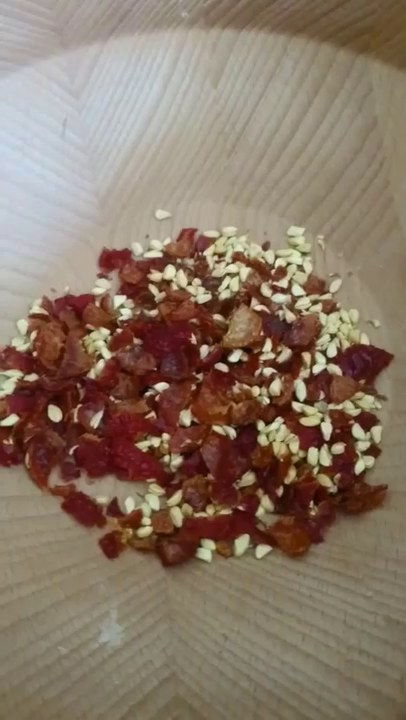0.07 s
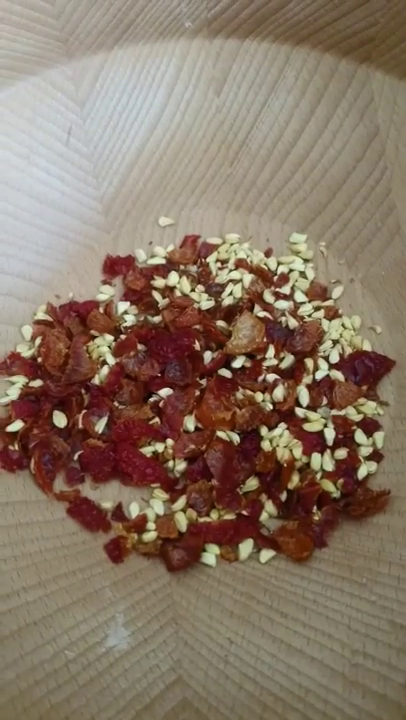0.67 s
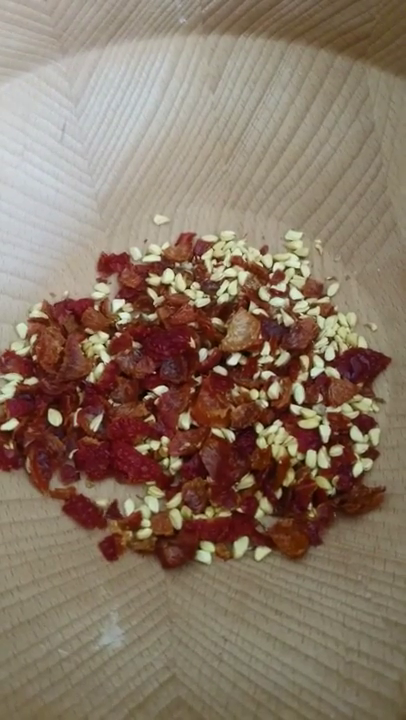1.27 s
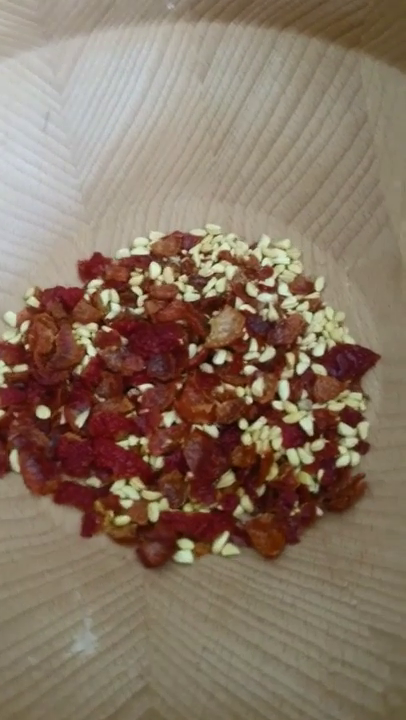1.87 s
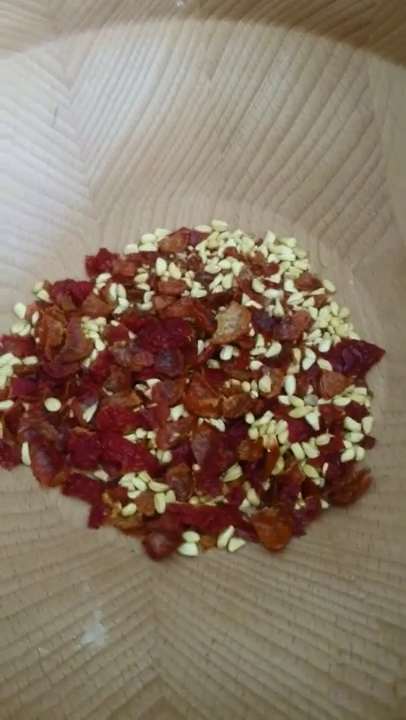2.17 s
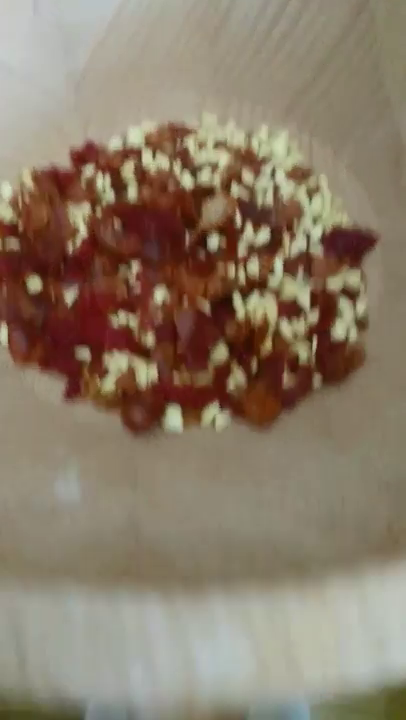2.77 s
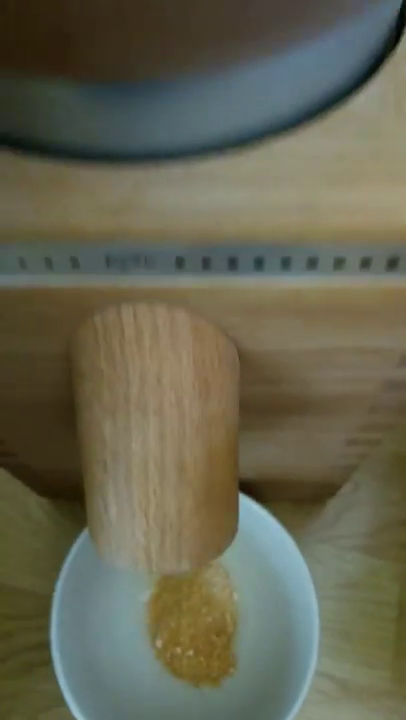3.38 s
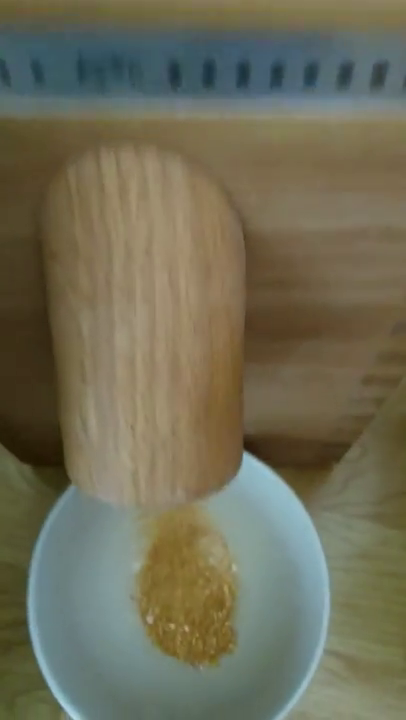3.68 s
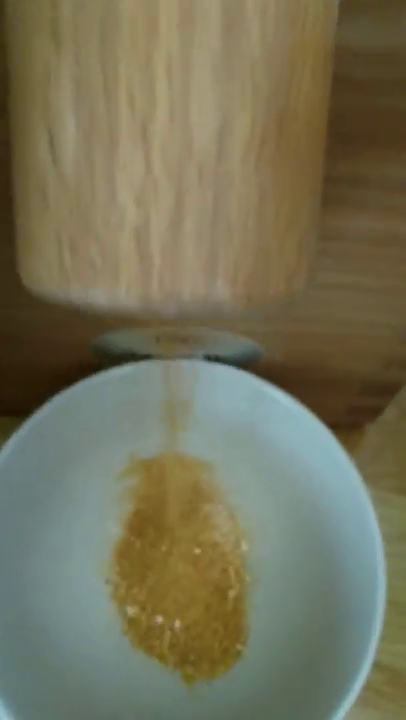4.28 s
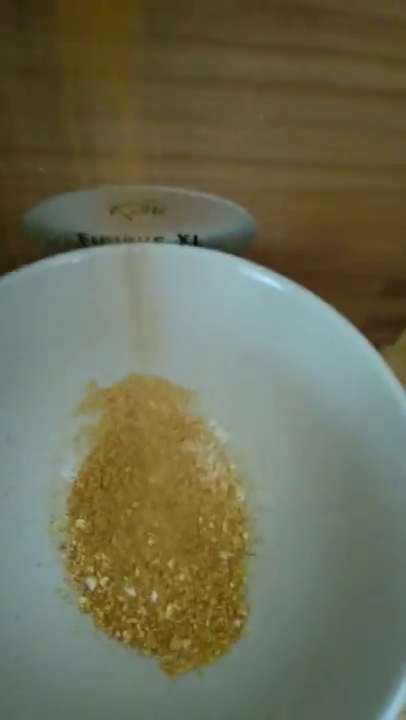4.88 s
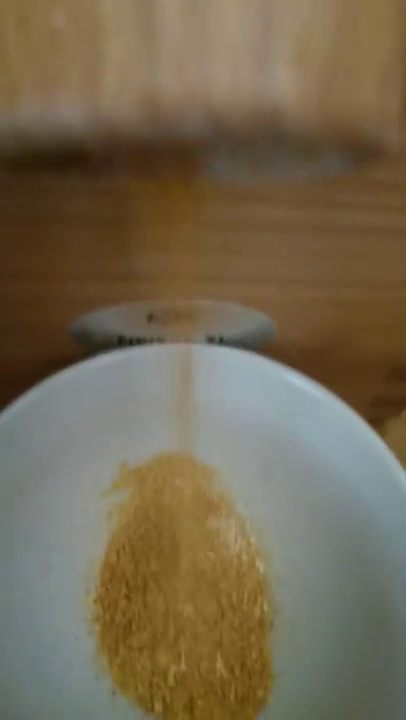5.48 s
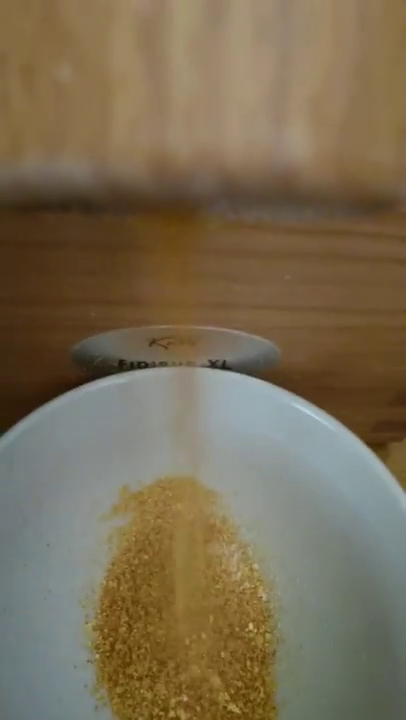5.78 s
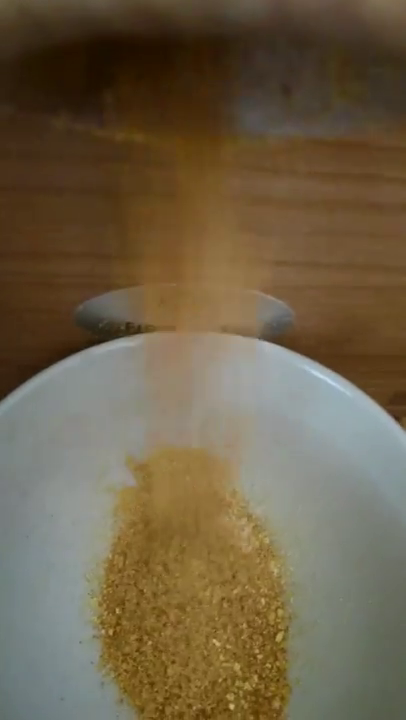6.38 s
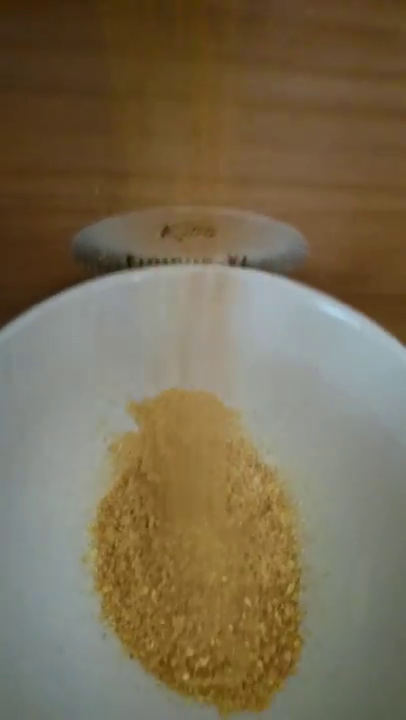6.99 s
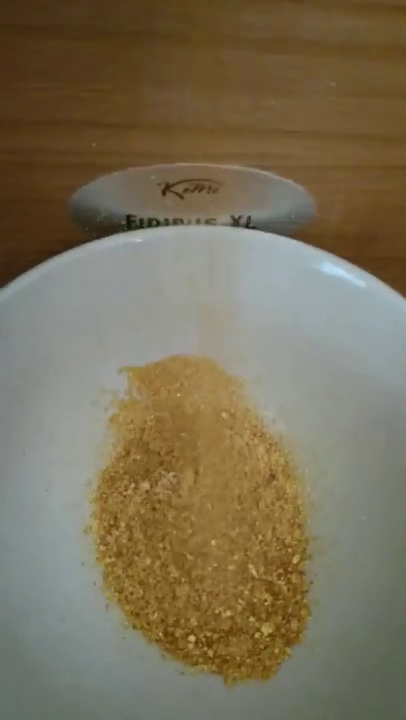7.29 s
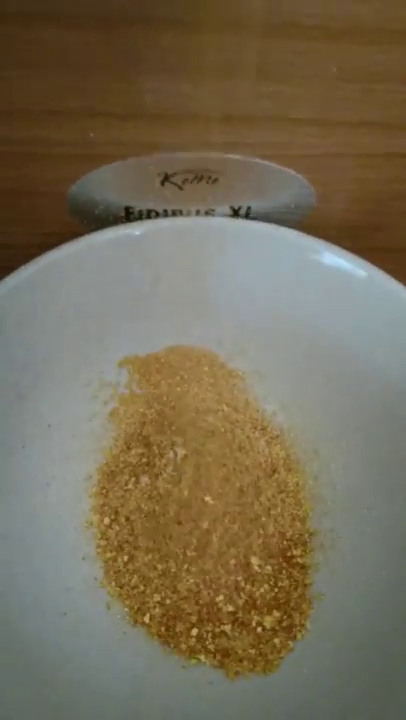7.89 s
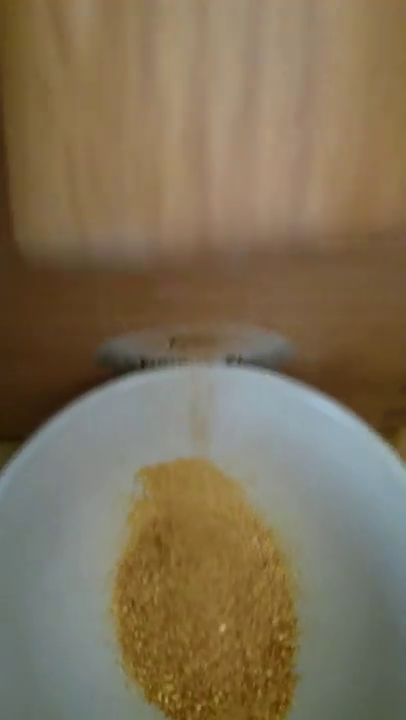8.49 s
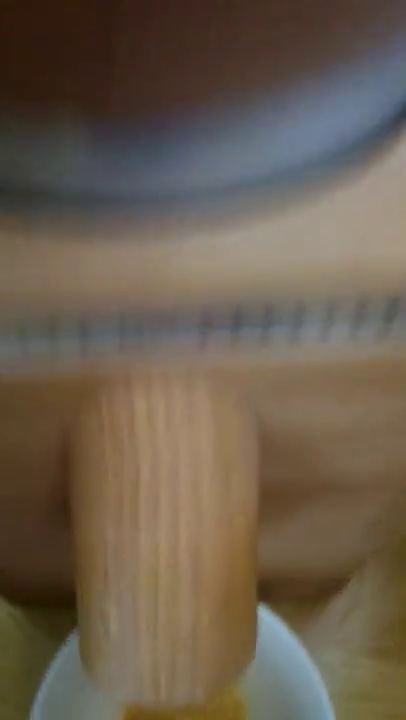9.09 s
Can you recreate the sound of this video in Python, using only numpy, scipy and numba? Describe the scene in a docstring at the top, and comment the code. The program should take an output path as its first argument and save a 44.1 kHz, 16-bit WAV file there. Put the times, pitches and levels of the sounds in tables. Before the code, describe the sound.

An electric stone mill clicks on and grinds dried chilli and seeds with a steady, gritty noise over its motor hum.

```python
"""On a worktop indoors, an electric stone mill in a wooden case starts with a sharp click and grinds
dried chilli and seeds. Fracturing grains, bunched by the turning stone, excite the resonances of the
case over the hum of the induction motor; now and then a hard seed snaps. A two-port microphone moves
from the hopper down the front to the flour spout, dips under it and comes back up, passing through
the beams, shadows and reflections of the case."""
import sys
import numpy as np
from scipy import signal
from scipy.fft import rfft, irfft
from scipy.io import wavfile
from scipy.ndimage import uniform_filter1d, minimum_filter1d
from numba import njit

SR = 44100
rng = np.random.default_rng(int(sys.argv[2]) if len(sys.argv) > 2 else 0)


def to_wav(s):
    """Save 16-bit WAV."""
    ch = np.atleast_2d(s).T  # columns
    pcm = np.round(np.clip(ch, -1, 1) * 32767)  # PCM
    wavfile.write(sys.argv[1], SR, pcm.astype(np.int16))


N = 407484
TIME, FREQ = np.arange(N) / SR, np.fft.rfftfreq(N, 1 / SR)
START_S, RETURN_S = 0.9628, 7.86  # the mill starts; the microphone turns back


def undb(db):
    """Amplitude ratio of a level in decibels."""
    return 10 ** (np.asarray(db) / 20)

def stereo(db, pan_db):
    """Level difference: left and right gains, where pan is left minus right."""
    return undb(db + np.array([np.atleast_1d(pan_db)]) * [[0.5], [-0.5]])

def curve(table, at=TIME):
    """Linear interpolation of each later column against the first."""
    points, *columns = np.transpose(table)
    return [np.interp(at, points, column) for column in columns]

def spectrum(table, hz):
    """Interpolation of each later column on a logarithmic frequency axis."""
    points, *columns = np.transpose(table)
    return [np.interp(np.log(hz + 1), np.log(points), column) for column in columns]

def wander(per_s):
    """Slow random modulation with a spread near 1."""
    knots = rng.standard_normal(400)
    return np.interp(TIME * per_s, np.arange(len(knots)), knots)

def decay(age, t60):
    """Exponential damping: 60 dB in t60 seconds."""
    return np.exp(-np.log(1000) * age / t60)

def bell(at_s, length_s):
    """Gaussian pulse, length_s wide at 1/e of its height."""
    return np.exp(-(2 * (TIME - at_s) / length_s) ** 2)

def resonance(hz, centre, width):
    """Lorentzian curve of unit height."""
    return 1 / (1 + (2 * (hz - centre) / width) ** 2)

def lowpass(hz, power=8):
    """Low-pass gain curve, one half at hz."""
    return 1 / (1 + (FREQ / hz) ** power)

def shape(x, gain):
    """Filtering by multiplication of the spectrum."""
    return irfft(rfft(x) * gain, N)

def ring(x, db, size=4096):
    """Minimum-phase filter of response db: being causal, it rings only after a blow."""
    cepstrum = irfft(np.log(undb(db)))
    cepstrum[1:size // 2] *= 2
    cepstrum[size // 2 + 1:] = 0
    impulse_response = irfft(np.exp(rfft(cepstrum)))
    return signal.oaconvolve(x, impulse_response)[:N]

@njit
def band(x, hz, q):
    """Second-order resonator (state-variable band-pass) with a moving centre."""
    y, band_state, low_state = np.empty(len(x)), 0., 0.
    for i in range(len(x)):
        g = np.tan(np.pi * hz[i] / SR)
        v = (band_state + g * (x[i] - low_state)) / (1 + g * (g + 1 / q))
        band_state = 2 * v - band_state
        low_state += 2 * g * v
        y[i] = v / q
    return y


# Path of the microphone: (time [s], place [0 hopper, 1 front, 2 spout, 3 under the spout])
MIC_PATH = [(1.95, 0), (2.52, .11), (2.85, .27), (3.1, .6), (3.4, 1), (3.65, 1.08), (4.15, 1.5),
            (4.35, 2.1), (4.6, 2.45), (4.95, 2.4), (5.2, 2.05), (5.65, 2.05), (6, 2.25), (6.55, 2.42),
            (6.8, 3), (7.85, 3), (8.05, 2.2), (8.24, 1.5), (8.48, 1.08), (8.74, .82), (9.05, .18),
            (9.24, .03)]
def mic_place():
    """Position of the receiver in the near field of the mill."""
    return curve(MIC_PATH)[0]

def at_place(values, place):
    """Linear interpolation between values at places 0 to 3."""
    return np.interp(place, np.arange(len(values)), values)

def way_back(takes_s=1):
    """Progress of the return: 0 on the way down, then rising to 1."""
    return np.clip((TIME - RETURN_S) / takes_s, 0, 1)


def room(sound, wet_db=-14, t60=0.18, low_hz=600):
    """Reverberation: worktop and walls return a short, weak tail."""
    age = np.arange(SR // 4) / SR
    tail = rng.standard_normal((2, len(age))) * decay(age, t60)
    tail = signal.sosfilt(signal.butter(2, low_hz, "high", fs=SR, output="sos"), tail)
    tail /= np.linalg.norm(tail, axis=1, keepdims=True)
    return sound + undb(wet_db) * signal.oaconvolve(sound, tail, axes=1)[:, :N]

def tick(at_s=0.872, hz=4030, db=-60, t60=0.17, hiss_db=-70):
    """Damped oscillation: a faint tick just before the start, with low hiss from then on."""
    age = np.maximum(TIME - at_s, 0)
    ping = undb(db) * decay(age, t60) * np.sin(2 * np.pi * hz * age)
    hiss = signal.lfilter([1], [1, -0.95], rng.standard_normal((2, N)))
    return ping + (age > 0) * undb(hiss_db) * hiss / hiss.std()

# Motor hum at places 0 to 3 on the way down: (level [dB], pan [dB])
HUM_LEVELS = [(-57, -11.5), (-42.5, -7.5), (-35.5, -4.5), (-33.5, -3.5)]
def motor_hum(place, hz=100, return_db=8.5):
    """Magnetic force pulses at twice the mains frequency; the way back passes closer to the motor."""
    db, pan_db = (at_place(column, place) for column in np.transpose(HUM_LEVELS))
    return np.sqrt(2) * stereo(db + return_db * way_back(), pan_db) * np.sin(2 * np.pi * hz * TIME)

# Shaft speed, rising a little toward the end, so the stone's tones creep up: (time [s], rate [turns/s])
SHAFT_SPEED = [(1, 22.9), (2.7, 22.85), (5.5, 23), (7, 23.3), (8.3, 23.2), (9.24, 23.4)]
def shaft_turns():
    """Phase in turns is the integral of the rotation rate."""
    return np.cumsum(curve(SHAFT_SPEED)[0]) / SR

# Tones of the stone: (order [cycles/turn], level at hopper [dB], level at spout [dB])
STONE_ORDERS = [(8, -66, -40.5), (12, -38, -38), (16, -36.5, -66), (20, -31.5, -46)]
def stone_tones(turns, place, rumble_db, waver_db=3, waver_per_s=11, drift_rad=0.65, throb=0.19):
    """Rotational harmonics grow with the bite and are amplitude-modulated once a turn."""
    bite = undb(0.35 * rumble_db) * (1 + throb * np.cos(2 * np.pi * turns))
    tones = 0
    for order, hopper_db, spout_db in STONE_ORDERS:
        swell, drift = wander(waver_per_s), wander(waver_per_s)
        db = np.interp(place, [0, 2], [hopper_db, spout_db]) + waver_db * swell
        tones += undb(db) * np.sin(2 * np.pi * order * turns + drift_rad * drift)
    return np.sqrt(2) * bite * tones

# Spells when the stones run close: (time [s], length [s], level [dB], pan [dB])
CLOSE_SPELLS = [(6.33, 0.8, -22, -8), (7.75, .35, -24.5, -6), (8.185, 0.4, -17, -4),
                (9.066, 0.61, -17.5, 16)]
def singing(turns, order=20, throb=0.85, right_lag_s=0.00061):
    """Amplitude modulation: as the stones run close, one harmonic swells and throbs once a turn."""
    swell = sum(stereo(db, pan_db) * bell(s, length) for s, length, db, pan_db in CLOSE_SPELLS)
    heard_turns = np.array([turns, np.interp(TIME - right_lag_s, TIME, turns)])
    tone = np.sin(2 * np.pi * order * heard_turns + wander(per_s=25))
    return np.sqrt(2) * swell * (1 + throb * np.cos(2 * np.pi * turns)) * tone

# Modes of the starting click: (frequency [Hz], relative level [dB], decay time T60 [s])
CLICK_PARTIALS = [(4060, -3, 0.024), (5000, 6, 0.028), (5650, -9, 0.028), (5900, -4, 0.027),
                  (7700, -1, 0.024), (7760, 1, 0.02), (8400, -6, 0.02), (10070, -6, 0.023)]
def click(ring_db=-15, crack_db=-7, crack_hz=(2600, 10500), attack_s=0.001):
    """Impulse excitation: a broadband crack and a few heavily damped modes."""
    age = np.maximum(TIME - START_S, 0)
    modes = sum(undb(db) * decay(age, t60) * np.sin(2 * np.pi * (hz * age + rng.random((2, 1))))
                for hz, db, t60 in CLICK_PARTIALS)
    crack_band = signal.butter(1, crack_hz, "band", fs=SR, output="sos")
    crack = signal.sosfilt(crack_band, rng.standard_normal((2, N))) * decay(age, t60=0.018)
    attack = 1 - np.exp(-age / attack_s)
    return stereo(0, pan_db=-7) * attack * (undb(ring_db) * modes + undb(crack_db) * crack)

# Dips and peaks of the ports: (frequency [Hz], width [Hz], left gain [dB], right gain [dB])
PORT_RESPONSE = [(1944, 86, -0.5, -7), (3210, 250, -2, -2), (4560, 240, 1, -2), (4960, 280, 1, 1.5),
                 (6120, 380, 1.5, 0), (6630, 400, 4.5, -8), (7840, 850, -11, 1), (9640, 330, 0, -2.5)]
def ports(sound):
    """Frequency response: each port weakens some narrow bands and favours others."""
    db = sum(np.outer(port_db, resonance(FREQ, hz, width)) for hz, width, *port_db in PORT_RESPONSE)
    return shape(sound, undb(db))

# Echo off the lid: (place [0-3], delay [ms], reflected share [0-1])
LID_REFLECTION = [(0, 2.17, 0), (.25, 2, 0.36), (.6, 1.64, 0.02), (1, 1.43, 0), (1.1, 1.16, 0),
                  (1.5, .7, .32), (2, 0.54, 0), (3, 0.45, 0.15)]
def lid(sound, place, low_hz=1100):
    """Comb filtering: the treble interferes with its echo and swishes as the delay changes."""
    delay_ms, share = curve(LID_REFLECTION, place)
    treble = shape(sound, 1 - lowpass(low_hz, power=2))
    echo = np.array([np.interp(TIME - delay_ms / 1000, TIME, port) for port in treble])
    return sound + share * echo

# Beams and shadows of the case: (place [0-3], half width [places], frequency [Hz], glide [Hz/place],
# bandwidth [Hz], left gain [dB], right gain [dB], way [1 down, -1 back, 0 both])
RADIATION_LOBES = [(0, 0.056, 9050, 0, 230, -0.5, 9.5, 0), (0, 0.072, 8000, 0, 900, -10, 6.5, 1),
                   (0, .15, 1440, 0, 250, -4, -1, 0), (.1, 0.045, 4340, -300, 220, 9.5, 10.5, 0),
                   (.15, .11, 5130, 2998, 1800, 7.5, 2.5, 0), (.56, 0.17, 4070, 0, 480, 6.5, 0, 0),
                   (.26, .09, 4440, -600, 520, 8.5, 4, 0), (.2, 0.088, 2490, 496, 150, 4, 4, -1),
                   (.14, 0.036, 3170, -1500, 330, 3, 5, 1), (.2, 0.24, 430, 0, 51, 0, 11, 0),
                   (.4, 0.29, 415, 0, 200, 0.5, -10, 0), (.46, 0.25, 787, 0, 494, -9.5, -0.5, 0),
                   (.62, 0.32, 2740, 330, 190, 10, 9.5, 0), (.77, 0.3, 3320, 0, 360, 8.5, 1, 0),
                   (.8, 0.37, 3900, 0, 350, -2.5, 2.5, 0), (1.3, .27, 715, 62, 120, 2, 2, 1),
                   (.9, 0.18, 650, 0, 111, 1, 0, -1), (1.1, 0.38, 855, 0, 170, -3, -5.5, -1),
                   (1.3, .33, 2650, 0, 100, 6, 9.5, 1), (1.38, .34, 3960, 98, 450, 2.5, 10.5, 0),
                   (1.55, 0.35, 8900, -2, 400, 1, 11.5, 0), (2.05, 0.17, 8960, 0, 450, 5, -1, 0),
                   (2.05, 0.15, 4050, 0, 300, -1, -4, 0), (2.3, .15, 10100, 0, 500, 0, 7, 0),
                   (2.5, .12, 1080, 0, 110, 3.5, 2.5, 0), (2.5, 0.1, 3900, 600, 350, 1, -0.5, 0),
                   (2.5, 0.6, 912, 14, 90, -3, 7, 0), (2.6, 0.41, 3330, 0, 350, .5, 0, 0),
                   (2.6, 1, 1420, 0, 260, 2.5, -0.5, 0), (2.8, 0.52, 5650, 152, 280, 8.5, 0, 0),
                   (3, 0.71, 758, 5, 70, 2.5, 4, 0), (3, 0.45, 1205, 0, 110, 6, 2.5, 0),
                   (2.9, .55, 4270, 350, 330, 3, 3, 0), (3, 0.57, 3720, 0, 300, -0.5, -3, 0),
                   (2.7, .5, 5000, 0, 200, 2, 3, 0), (2.8, .5, 6100, 0, 300, -5, -4, 0)]
def beams(sound, place, in_step_hz=1100):
    """Directivity: some bands radiate one way only; a treble beam reaches both ports in phase."""
    out = sound.copy()
    heading = np.where(TIME < RETURN_S, 1, -1)
    for centre, reach, hz, glide_hz, width, *port_db, way in RADIATION_LOBES:
        near = (abs(place - centre) < 3 * reach) & (heading != -way)
        offset = place[near] - centre
        inside = np.exp(-(offset / reach) ** 2)
        narrow = [band(port[near], hz + glide_hz * offset, hz / width) for port in sound]
        in_step = hz > in_step_hz and min(port_db) > 0
        for port, db in enumerate(port_db):
            out[port, near] += (undb(db * inside) - 1) * narrow[0 if in_step else port]
    return out

def facing(sound, place, centre=0.96, reach=0.4, earlier_ms=0.19, roar_hz=1300):
    """Time difference: in front of the case the roar reaches the right port sooner, nearing the middle."""
    advance_s = earlier_ms / 1000 * np.exp(-((place - centre) / reach) ** 4)
    left, right = sound
    roar = shape(right, lowpass(roar_hz))
    return np.array([left, right - roar + np.interp(TIME + advance_s, TIME, roar)])

# Reflection off the case at the right port: (place [0-3], cancelled share [0-1])
CASE_REFLECTION = [(0, 0.9), (.25, 0.5), (1.15, 0.9), (2, .7), (3, 0.68)]
def notch(sound, place, far_hz=370, near_hz=843, q=2.7, mid_place=1.17, span=0.62):
    """Destructive interference cancels a band, which rises as the detour shortens toward the spout."""
    closeness = place * (1 + 0.29 * way_back())  # the way back cuts closer to the case
    near = (1 + np.tanh((closeness - mid_place) / span)) / 2
    hz = far_hz + (near_hz - far_hz) * near
    depth = curve(CASE_REFLECTION, place)[0]
    left, right = sound
    return np.array([left, right - depth * band(right, hz, q)])

# Spectral envelope of the grinding at each place: (frequency [Hz], level [dB], pan [dB])
HOPPER_COLOUR = [(40.0, -82, 10), (134, -79, -6.5), (239, -62.5, -2), (319, -53.5, 1), (488.5, -35.5, 6),
                 (601, -40.5, -5.5), (782, -40.5, 5.5), (1060, -51.5, -2.5), (1620, -65, -5.5),
                 (2790, -56.5, -1.5), (4970, -70.5, -5.5), (8150, -75.5, 4.5), (9770, -77.5, 0.5),
                 (11700, -92.5, -1)]
FRONT_COLOUR = [(40.0, -99, 10), (130.0, -66, -8), (223, -55, 3), (357, -61.5, -5.5), (459, -56, 11),
                (582, -44, 5), (839, -41, -1), (1070, -55, -2), (1820, -56.5, 4.5), (2600, -64, 0.5),
                (4960, -74, -3.5), (7960, -77, 0.5), (10100, -82, -4), (11900, -100, 0)]
SPOUT_COLOUR = [(40.0, -84, 20), (130.0, -61.5, 2), (243, -53.5, 2), (315, -56.5, 1), (474, -50.5, -4.5),
                (616, -47.5, 1.5), (815, -45, 3.5), (1030, -52.5, 4), (1825, -53, 6), (2770, -59.5, 2.5),
                (4980, -71.5, -4.5), (7950, -78.5, -1), (9700, -80, -7), (11660, -100.5, 0)]
UNDER_COLOUR = [(40.0, -80, 10), (130.0, -56.5, 2.5), (242, -48.5, -0.5), (344, -55.5, 2.5),
                (490, -49.5, -5.5), (650, -48.5, -4.5), (820, -49, -3.5), (1050, -47.5, 0.5),
                (1700, -57, 7.5), (2520, -59, 0), (5180, -72.5, -2.5), (8000.0, -76.5, -0.5),
                (9970, -80.5, -2), (11600, -93, 2)]
# Modes of case, chamber and stones:
# (frequency [Hz], width [Hz], lift at hopper [dB], at front [dB], at spout [dB], under the spout [dB])
CASE_MODES = [(233, 52, 7.5, 6, 10.5, 9.5), (454, 38, 3, 7.5, 12.5, 13), (512, 31, 0, 7.5, 2, 8),
              (621, 38, -1, 3.5, 12, 8.5), (690.6, 37, 1, 8.5, 6.5, 14), (748, 63, 5.5, -3.5, 4, 0.5),
              (899, 95, 1, 5, 8, 3.5), (1180, 110, 2.5, 5, 5, 3), (1330, 136, 2.5, 7.5, 0, -0.5),
              (1828, 62, 9, 1.5, 3.5, 2), (1993, 152, 8.5, 7, 5.5, 6.5), (2390, 130, 0.5, 0.5, 7, 2.5),
              (2530, 337, 11, 9, 0, 5), (3100, 250, 2.5, 6.5, 10, 7.5), (3390, 120, 7, 0, 1, 4.5),
              (4000, 310, 6.5, 9, 13, 10), (4354, 240, 5.5, 10.5, 6.5, 12.5), (5510, 470, 3, 3.5, 2.5, 2.5),
              (6680, 280, 0.5, -1, 5.5, 3), (7500, 200, 3, 2, 4, 7.5), (8930, 520, 8.5, 7, 10, 8),
              (10070, 200, 5, 3, 10, 9)]
def case(drive, place, size=4096, dull_hz=13000):
    """Forced resonance: the case colours the grinding differently at each place."""
    hz = np.fft.rfftfreq(size, 1 / SR)
    out = np.zeros((2, N))
    for k, colour in enumerate([HOPPER_COLOUR, FRONT_COLOUR, SPOUT_COLOUR, UNDER_COLOUR]):
        db, pan_db = spectrum(colour, hz)
        db += sum(lift[k] * resonance(hz, centre, width) for centre, width, *lift in CASE_MODES)
        db -= 10 * np.log10(1 + (hz / dull_hz) ** 20)  # the wood absorbs the very top
        near = np.clip(1 - abs(place - k), 0, 1)
        out += near * np.array([ring(drive[0], db + pan_db / 2), ring(drive[1], db - pan_db / 2)])
    return out * np.sqrt(SR / 2)

# Bite of the stones as the feed comes and goes: (time [s], load [dB])
FEED_LOAD = [(1.05, -0.2), (1.55, 1.4), (2.2, -0.5), (2.82, -0.5), (3.1, 4), (3.38, 4), (3.6, 0.5),
             (4.1, 0.6), (4.6, 3.5), (5.3, 3.5), (5.58, 0.9), (5.85, 1.5), (6.85, 2.5), (7.08, -0.2),
             (7.8, 2), (8.2, 4), (8.48, 1.2), (8.7, 6)]
# Hard pieces caught by the stones: (time [s], length [s], rumble lift [dB], grit lift [dB])
HARD_LUMPS = [(1.28, 0.012, 1.5, -2), (2.51, 0.17, -1, 0.5), (3.222, 0.053, 8, 1), (4.55, 0.36, 0, 1.5),
              (5.451, 0.038, 11, -1), (5.847, 0.24, 5, -0.5), (6.31, 0.16, 4.5, -0.5),
              (6.88, 0.25, 6.5, -0.5), (7.537, 0.037, 11, 1), (8.052, 0.033, 10, -0.5),
              (8.141, 0.057, 9, -0.5), (8.265, 0.082, -3, 0), (8.693, 0.22, 7, -1.5)]
# Rumble, strongest at the open hopper, and grit at places 0 to 3: (level [dB])
RUMBLE_LEVELS = [0, -1, -4, -6.5]
GRIT_LEVELS = [-1.9, -0.37, -0.84, -1.14]
def feed(place, flutter_per_s=8, fresh_db=3.5, fresh_s=0.85, shadow_db=-2.5, rim_place=0.029):
    """Excitation follows load: levels of rumble, grinding and grit in dB under an uneven feed."""
    load = curve(FEED_LOAD)[0] + wander(flutter_per_s)
    thud, crunch = sum(np.outer(lift_db, bell(s, length)) for s, length, *lift_db in HARD_LUMPS)
    whole_seeds = np.exp(-(np.maximum(TIME - START_S, 0) / fresh_s) ** 2)
    hidden = way_back() * np.tanh(place / rim_place)  # the rim of the hopper hides the stones
    rumble = at_place(RUMBLE_LEVELS, place) + 0.67 * load + thud + wander(flutter_per_s)
    grit = at_place(GRIT_LEVELS, place) + 0.79 * load + crunch
    grit += fresh_db * whole_seeds + shadow_db * hidden
    return rumble, load, grit

# Single hard seeds: (time [s], relative knock level [dB], relative grit level [dB])
SEED_SNAPS = [(1.262, 13, -3), (1.311, 7, -2), (1.487, 9, 0), (1.521, 3, 1), (1.534, 6.5, 6),
              (1.577, 14, 7), (1.913, 8, -6), (2.794, -8, 3), (3.32, -1, 5), (3.441, 6, -2), (3.616, 0, -6),
              (4.027, -11, 5), (4.188, -9, -3), (4.464, -3, -4), (6.203, -7, -5), (7.965, -6, 11.5),
              (8.443, 10, -2), (8.828, 10, -5), (8.862, -1, -1), (9.106, -8, 2)]
def snaps(push_db=11.5, decay_s=0.0052, lull_db=-4, lull_s=0.011):
    """Brittle fracture: an impulse, a decaying grit envelope, and a lull before the hardest snaps."""
    hits = np.zeros((2, N))
    for s, *db in SEED_SNAPS:
        hits[:, int(s * SR)] = undb(db)
    burst = signal.lfilter([1], [1, -np.exp(-1 / (decay_s * SR))], hits[1])
    # a hard seed holds the stones apart just before it gives way
    held = sum(bell(s - lull_s / 2, lull_s) for s, knock_db, _ in SEED_SNAPS if knock_db > 8)
    return undb(push_db) * hits[0], burst, undb(lull_db * held)

def crush(turns, per_s, spread_db, decay_s, share, wobble, furrow):
    """Shot noise: envelope of breaking grains over smooth rubbing, bunched once and four times a turn."""
    chance, size = rng.random(N), np.minimum(rng.exponential(size=N), 5)
    breaks = (chance < per_s / SR) * undb(spread_db * size) ** 2
    power = signal.lfilter([1], [1, -np.exp(-1 / (decay_s * SR))], breaks)
    bunching = np.exp(wobble * np.cos(2 * np.pi * turns) + furrow * np.cos(8 * np.pi * turns))
    power = (1 - share + share * power / power.mean()) * bunching ** 2
    return np.sqrt(power / power.mean())

# Likeness of the grinding at the two ports: (frequency [Hz], correlation [0-1], right lag [ms])
PORT_COHERENCE = [(100, 0.87, 0.22), (397, 0.85, 0.43), (766, 0.94, 0.61), (1140, 0.5, 0.81),
                  (1650, 0.23, 0.66), (2190, 0.31, 0.86), (3000, 0.35, 0.888), (3950, 0.44, 0.886),
                  (5000, 0.28, 0.814), (6200, 0.25, 0.75), (7540, 0.1, 0.677), (10100, 0.03, 0.61)]
def stones(turns, rumble_db, grind_db, grit_db, low_hz=340, high_hz=2100):
    """Friction and fracture: rumble, grinding and fine grit, partly coherent between the ports."""
    alike, lag_ms = spectrum(PORT_COHERENCE, FREQ)
    common, own = rng.standard_normal(N), rng.standard_normal((2, N))
    lag = np.exp(-2j * np.pi * FREQ * np.outer([0, 1], lag_ms) / 1000)
    rub = shape(common, np.sqrt(alike) * lag) + shape(own, np.sqrt(1 - alike))
    bass, treble = lowpass(low_hz), 1 - lowpass(high_hz)
    middle = 1 - bass - treble
    coarse = crush(turns, per_s=600, spread_db=2.1, decay_s=0.013, share=0.75, wobble=0.074, furrow=0.075)
    fine = crush(turns, per_s=1700, spread_db=2.5, decay_s=0.0024, share=0.43, wobble=0.072, furrow=0.037)
    knock, burst, lull = snaps()
    body = undb(rumble_db) * shape(rub, bass) + undb(grind_db) * shape(rub, middle)
    grit = np.hypot(lull * fine, burst) * undb(grit_db) * shape(rub, treble)
    return lull * coarse * body + shape(knock, middle * lag) + grit


def scene(rise_s=0.02, grinding_db=-0.84):
    """Superposition: grinding, hum and tones set in with the click and run on."""
    place, turns = mic_place(), shaft_turns()
    running = 1 - np.exp(-np.maximum(TIME - START_S, 0) / rise_s)
    rumble_db, grind_db, grit_db = feed(place)
    grinding = stones(turns, rumble_db, grind_db, grit_db)
    for transmission in (case, notch, facing, beams, lid):
        grinding = transmission(grinding, place)
    # the microphone comes back up turned a little to one side
    grinding = stereo(grinding_db, pan_db=way_back() ** 4) * ports(grinding)
    mill = room(running * grinding + click())
    tones = motor_hum(place) + stone_tones(turns, place, rumble_db) + singing(turns)
    return mill + running * tones + tick()

def record(dry, ceiling=0.9, top_hz=15600):
    """Peak limiting and band limiting: the gain ducks around the highest peaks; the top is cut."""
    hold = SR // 100
    gain = ceiling / np.maximum(abs(dry).max(axis=0), ceiling)
    gain = uniform_filter1d(minimum_filter1d(gain, hold), hold)
    return signal.sosfilt(signal.ellip(8, 0.2, 80, top_hz, fs=SR, output="sos"), dry * gain)


dry = scene()
out = record(dry)
to_wav(out)
```